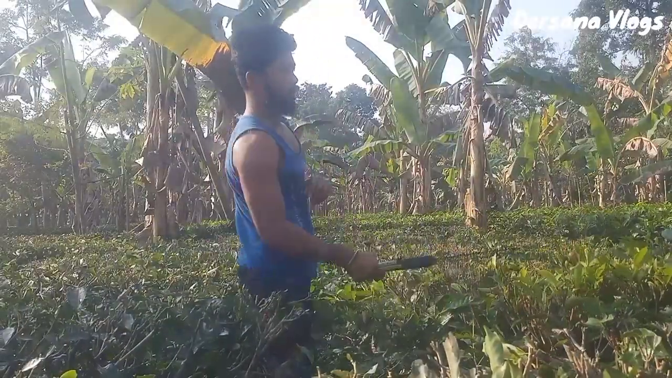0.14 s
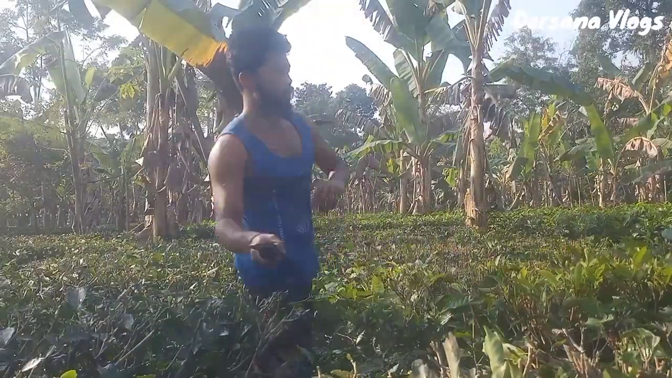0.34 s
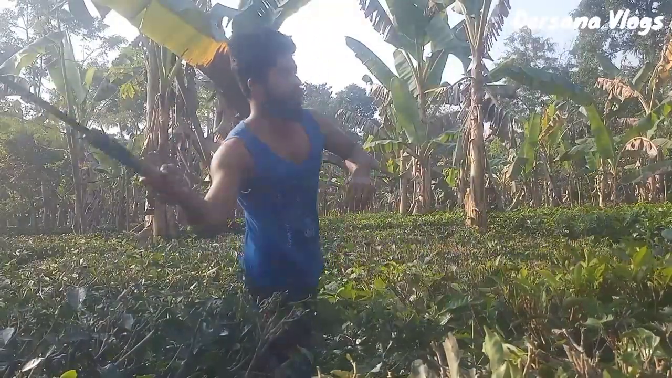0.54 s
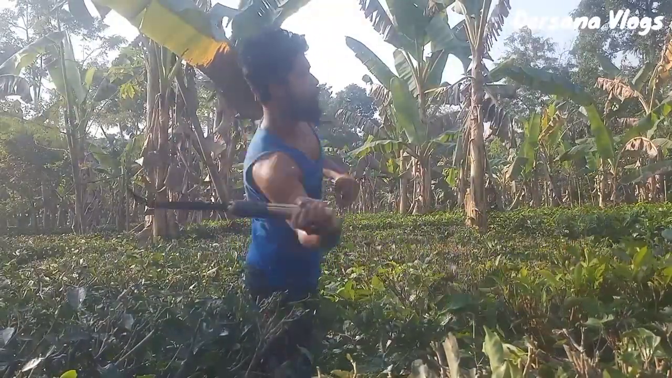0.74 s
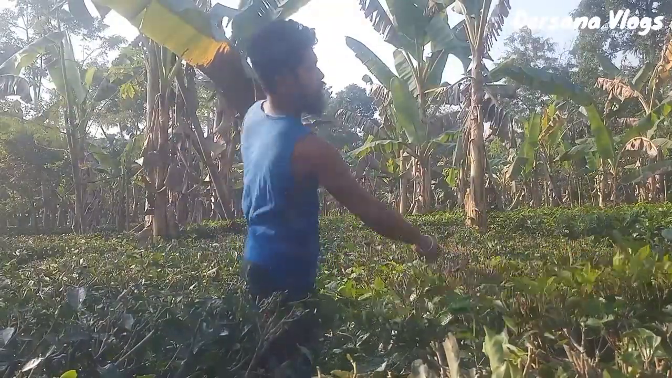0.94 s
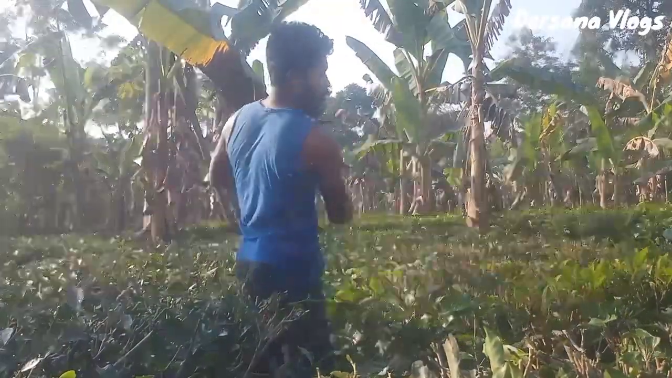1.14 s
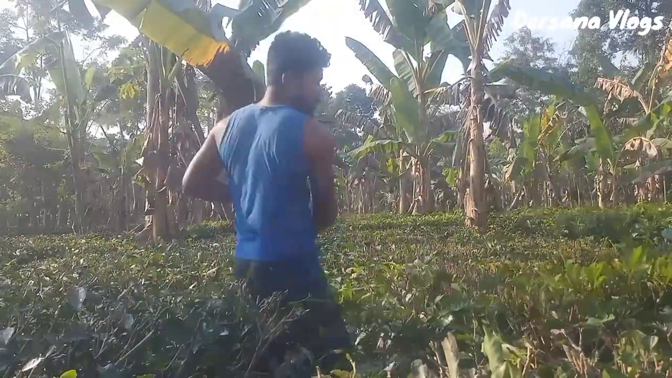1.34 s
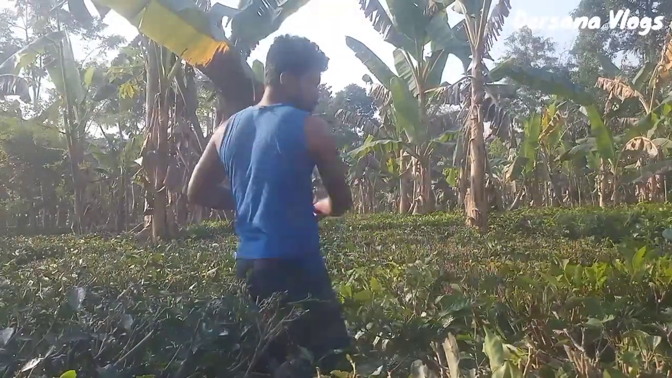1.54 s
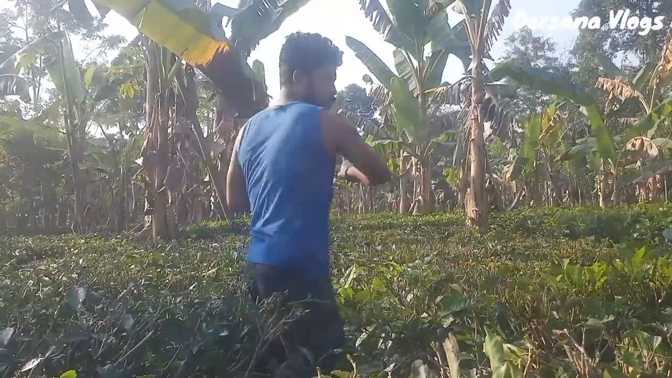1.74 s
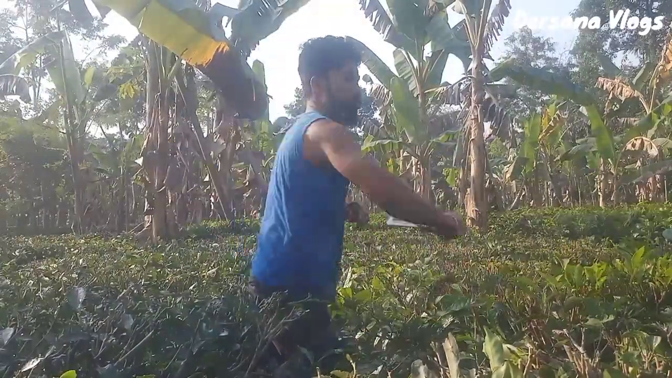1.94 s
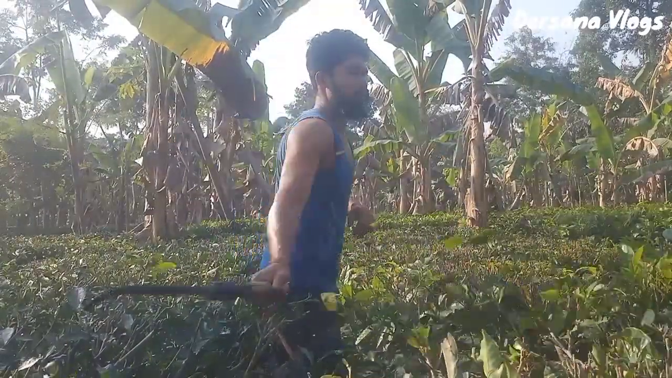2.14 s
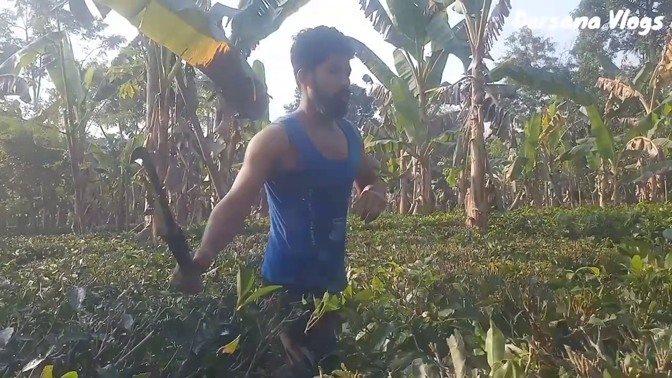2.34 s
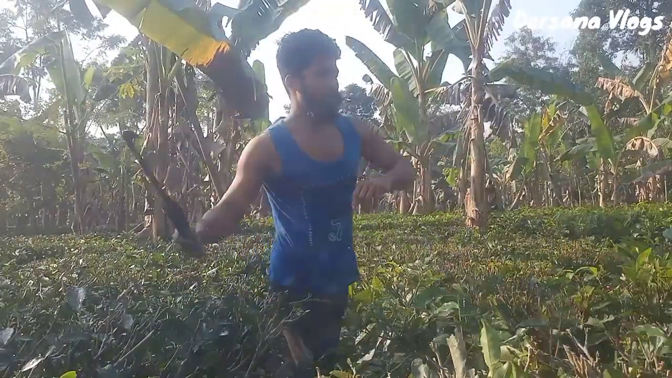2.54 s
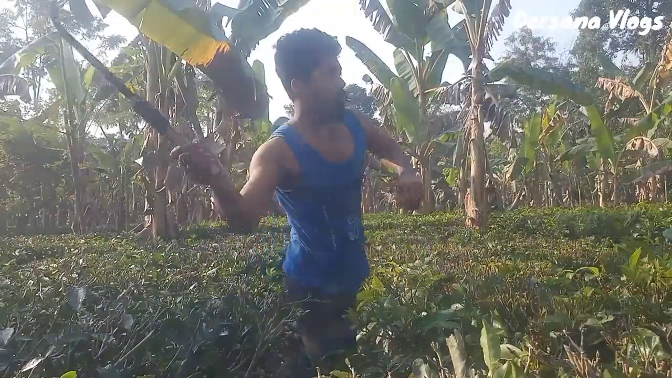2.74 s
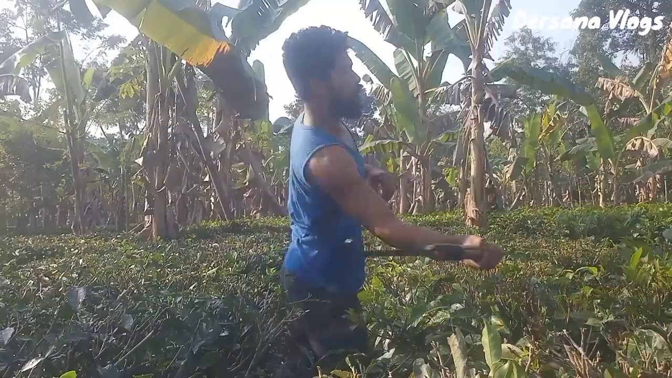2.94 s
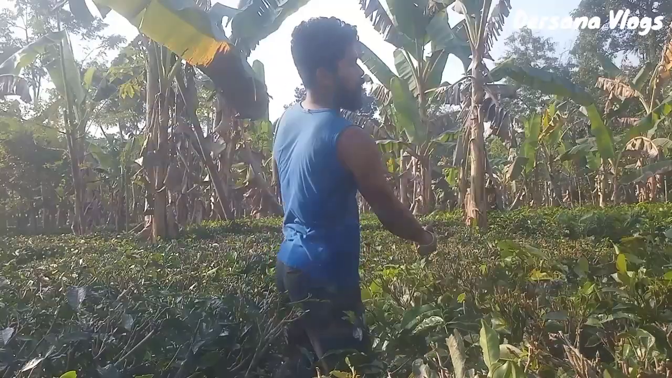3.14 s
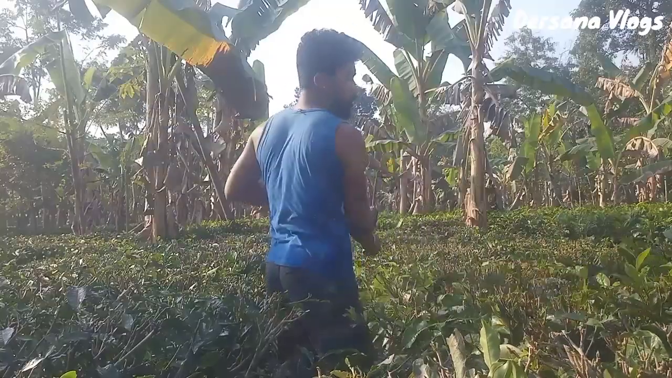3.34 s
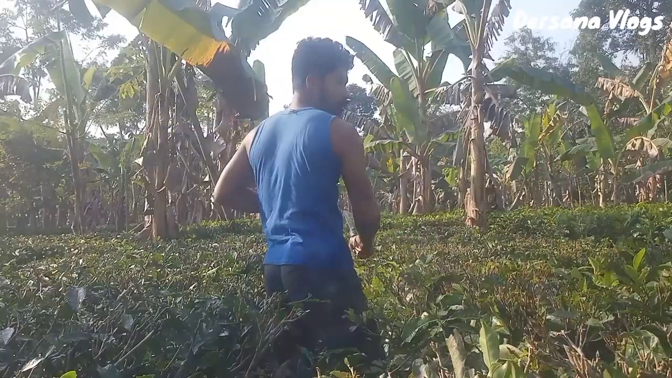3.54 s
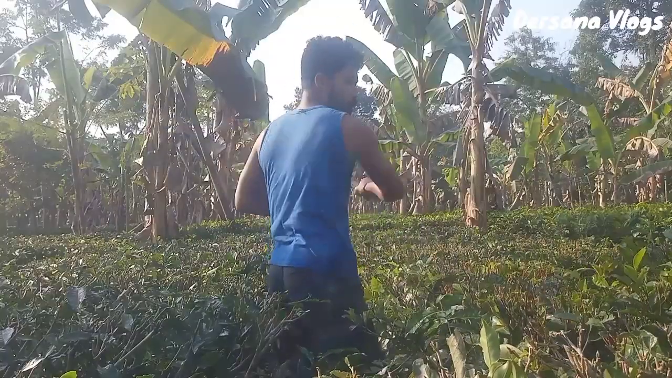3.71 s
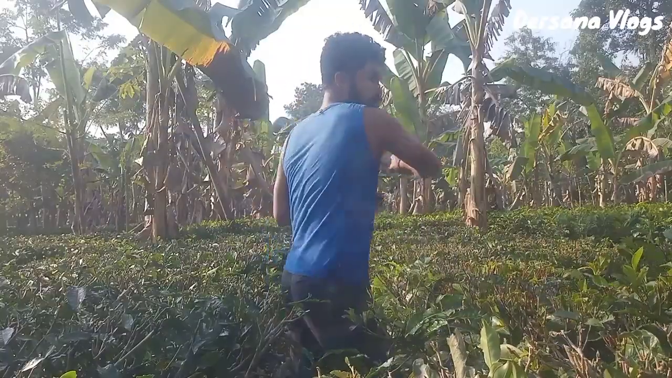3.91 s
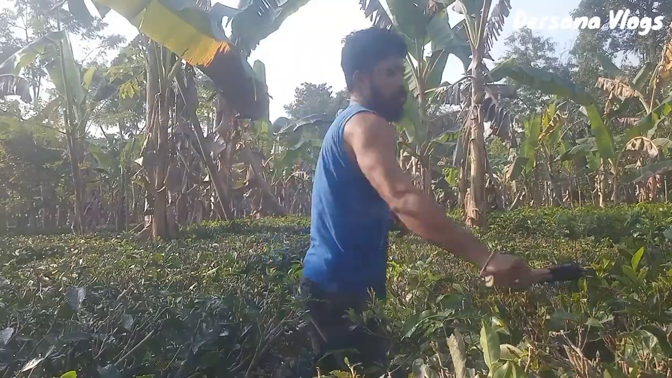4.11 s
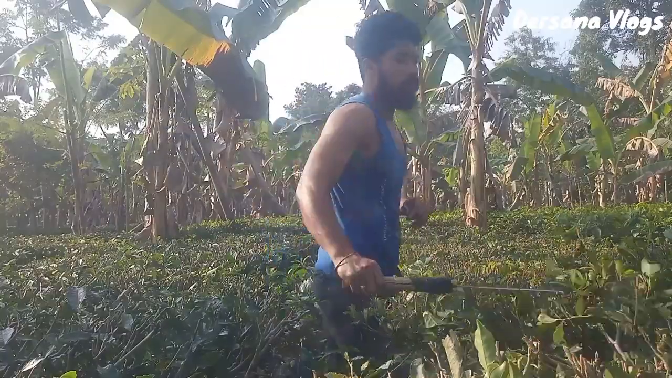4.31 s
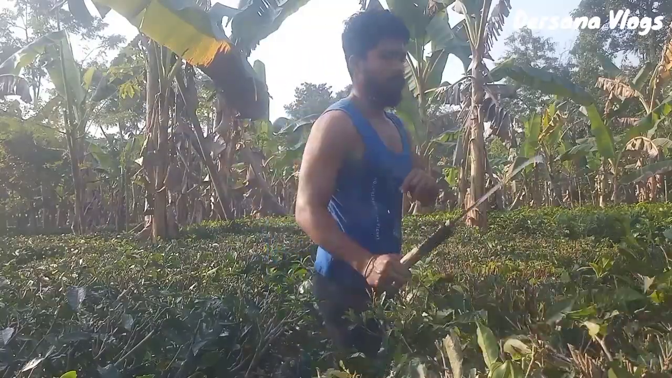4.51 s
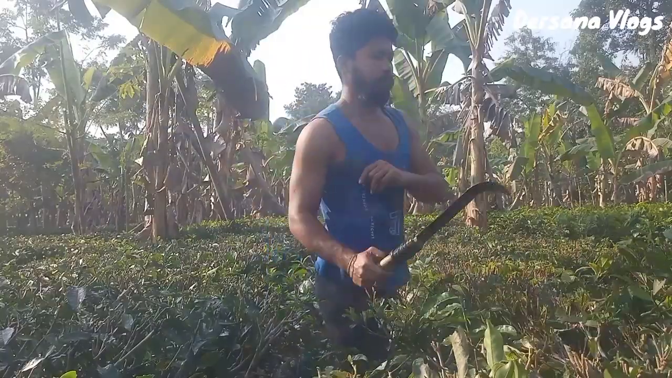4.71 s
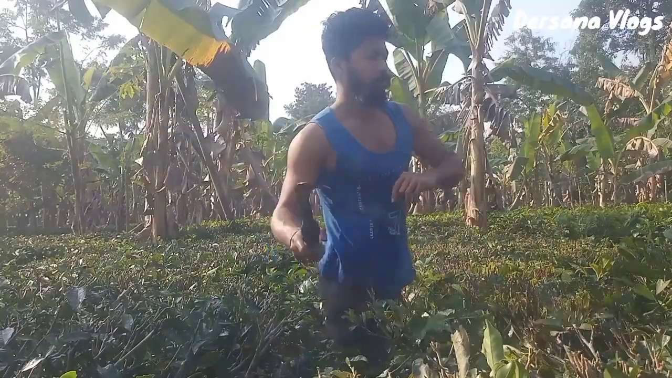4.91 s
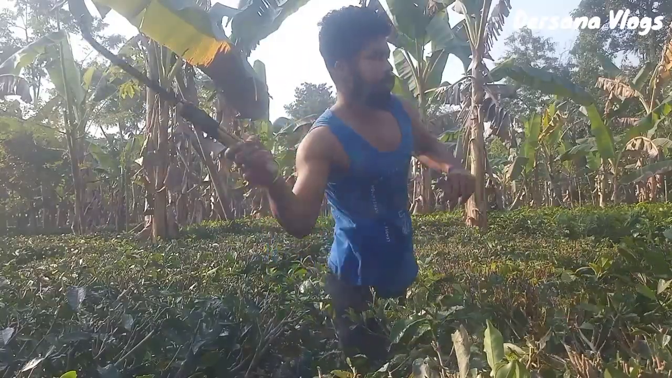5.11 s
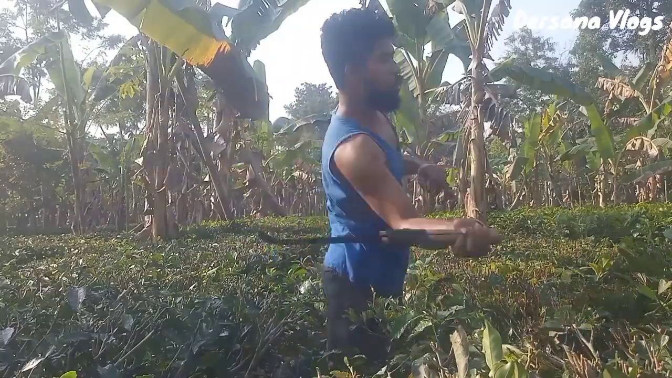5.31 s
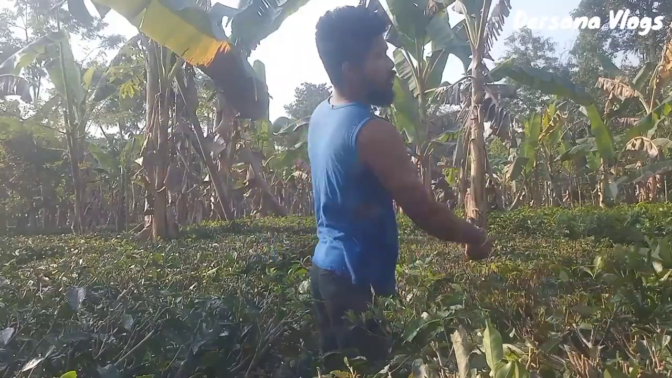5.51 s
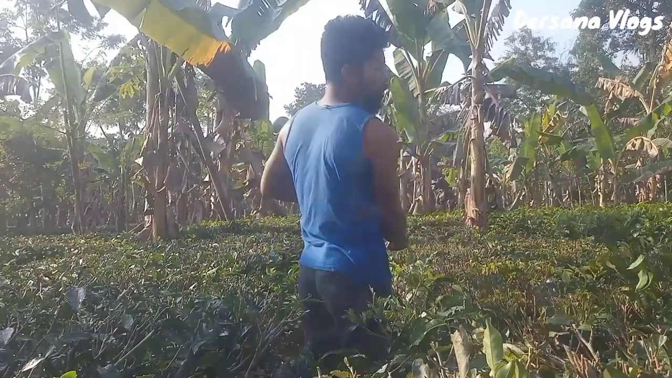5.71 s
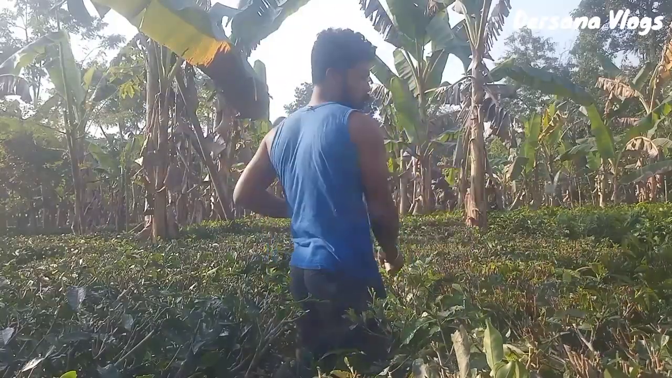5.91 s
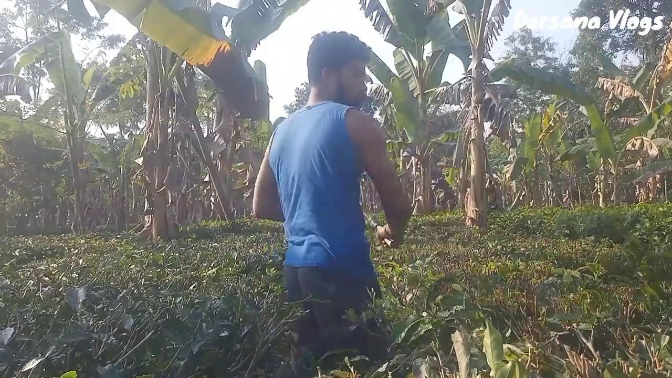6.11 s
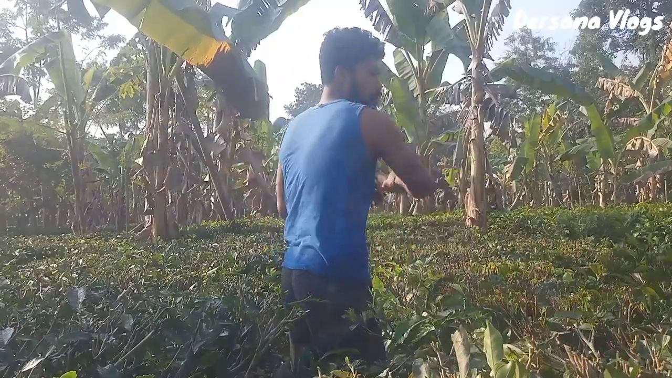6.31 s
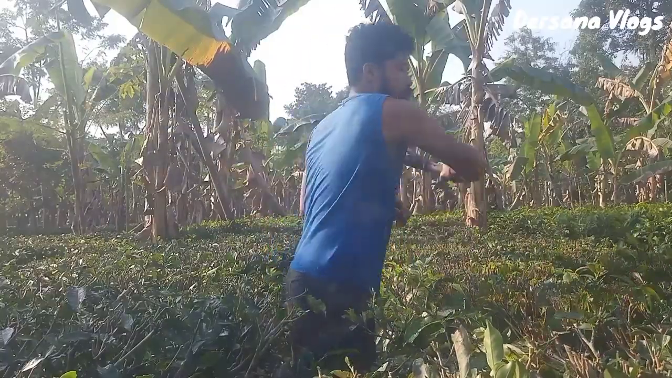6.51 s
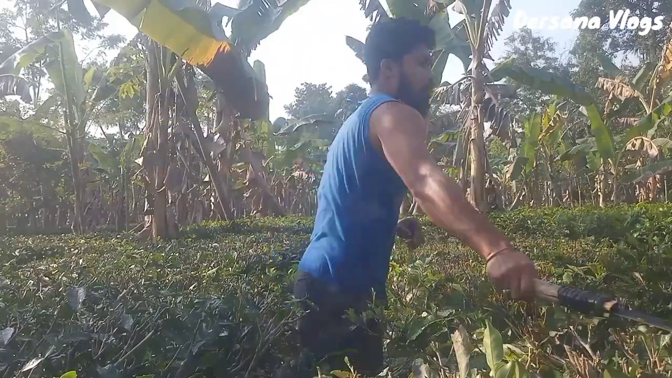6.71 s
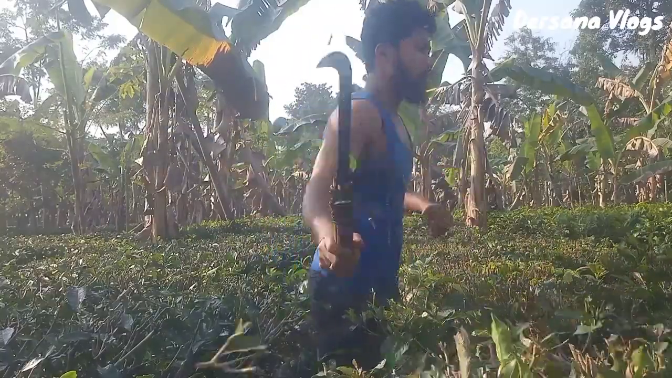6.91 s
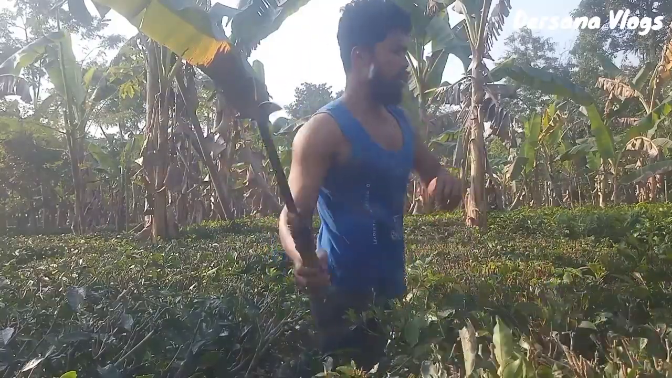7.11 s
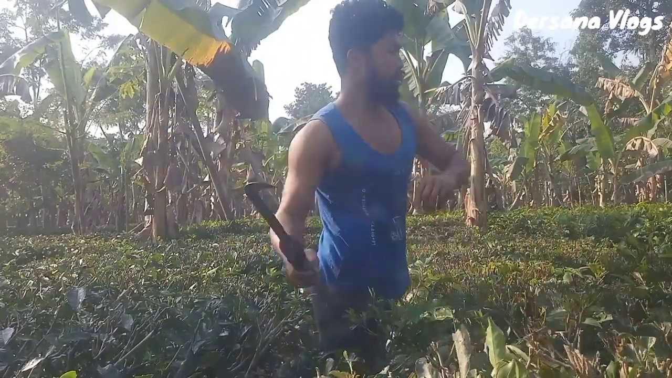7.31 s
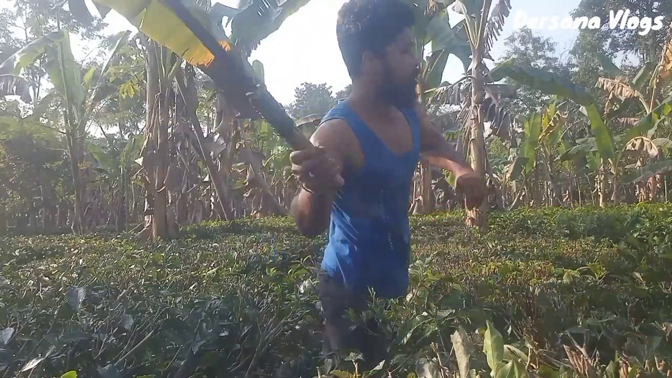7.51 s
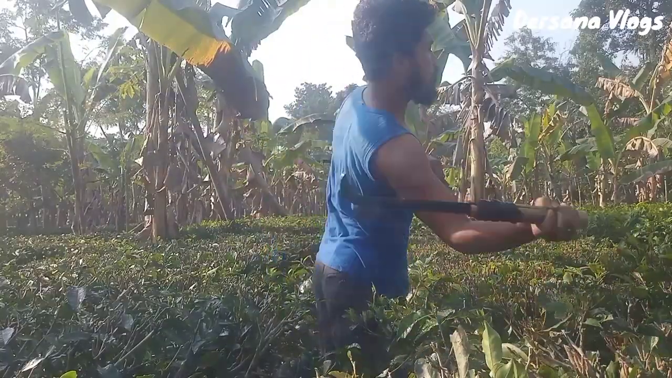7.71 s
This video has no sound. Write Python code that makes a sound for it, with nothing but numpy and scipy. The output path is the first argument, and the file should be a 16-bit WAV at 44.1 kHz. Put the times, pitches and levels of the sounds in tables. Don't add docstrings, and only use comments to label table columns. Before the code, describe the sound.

For the first second there is only soft leaf rustle, light brushing movement, a few small twig snaps and very faint high bird chirps over a quiet garden. At about 1.05 seconds a blade bites through foliage with a loud crunch and several stem cracks. Branches whip back and leaves swish, then settle among tiny ticks and a hollow knock. Further cuts come near 2.2, sharp and hissy; 3.2, loudest and short; 4.3, with a hard double crack; 5.6, with a longer tail and bright stalk knocks just after; and 6.9, with the longest swish. Between them, leaves stir and twigs snap, notably at 4.5 and 5.8. A faint bird note comes at 2.8 and two rising ones near 7.6 as rustling continues to the end. The sound is close, dry and outdoors, brighter and overloaded on the right, muffled on the left.

```python
import sys
import numpy as np
from scipy import signal
from scipy.fft import rfft, irfft
from scipy.io import wavfile

SR = 44100
rng = np.random.default_rng(int(sys.argv[2]) if len(sys.argv) > 2 else 0)


def level_to_linear(level):
    exponent = np.asarray(level, float) / 20
    return 10 ** exponent


def transcribe(u):
    v = np.clip(np.atleast_2d(u).T, -1, 1)
    q = np.round(v * 32767).astype(np.int16)
    wavfile.write(sys.argv[1], SR, q)


N = 341775
TOP_HZ = 14600

# first touch in seconds, cut in seconds, rise in seconds, peak in dB, t60 in seconds.
CUTS = [
    (1.05, 1.057, 0.014, -11, 0.1),
    (2.216, 2.224, 0.0034, -11.5, 0.17),
    (3.192, 3.198, 0.0093, -8, 0.079),
    (4.312, 4.326, 0.0057, -10.5, 0.11),
    (5.577, 5.585, 0.0056, -11.5, 0.26),
    (6.862, 6.878, .006, -12.5, 0.41),
]
# first touch in dB, hold in seconds, extra thud in dB, extra hiss in dB.
BITES = [
    (-22, 0.018, -1, 0),
    (-28, 0.01, 5, 4),
    (-26.5, 0.0099, 1.5, -0.5),
    (-21, 0.033, -1, 1),
    (-30.5, 0.011, -7, 2.5),
    (-36.5, 0.022, 0.5, 1),
]
# whip in dB, whip t60 in seconds, settle in dB,
# settle t60 in seconds.
AFTER = [
    (-36, 0.42, -41, 3.8),
    (-17.5, 0.38, -37, 3.95),
    (-18, 0.78, -35.5, 4.8),
    (-18, 0.6, -38, 4.04),
    (-21, 0.99, -31, 2.77),
    (-16.5, 0.48, -39, 5),
    (-19.5, 0.79, -30.5, 2.56),
]
# middle in seconds, length in seconds, level in dB, extra thud in dB.
STIRS = [(0.273, 0.086, -42, 7.5), (0.527, 0.26, -50, 2), (0.822, 0.085, -49, 7), (1.025, 0.087, -52.5, 6),
         (1.192, 0.052, -38, 9), (1.417, 0.16, -52.5, 16), (1.757, 0.26, -45, 3), (2.036, 0.13, -52.5, -1),
         (2.894, 0.067, -53, 18), (3.685, 0.84, -48, 6), (4.058, .14, -47.5, 2.5),
         (4.236, 0.068, -44.5, -6), (4.624, 0.24, -36, 4.5), (4.885, 0.13, -41, -0.5), (5.052, .1, -42, -7),
         (5.145, 0.057, -45, -10), (5.314, 0.16, -47.5, -20), (6.01, 0.24, -56, -7), (6.31, 0.13, -46, 7.5),
         (6.513, 0.09, -47.5, 4), (6.76, 0.035, -59, -10), (7.199, 0.1, -35.5, 6.5),
         (7.355, 0.036, -39.5, 4), (7.4, .05, -38, 8), (7.533, 0.2, -45, -16), (7.7, 0.11, -44.5, -11)]
# thud in dB, swish in dB, hiss in dB, air in dB.
CUT_TONE_DB = (-8, -1, -6, -15.5)
WHIP_TONE_DB = (-2, 3, -2, -9)
SETTLE_TONE_DB = (-7.5, 0.5, -9.5, -18)
STIR_TONE_DB = (-9.5, 0.5, -9.5, -19)
BAND_EDGES_HZ = [50, 900, 4300, 7800, 19000]
# frequency in Hz, density in dB per Hz.
LEAVES_SPECTRUM = [(24, -40), (40, -38), (77, -15.5), (136, -10), (179, -11.5), (319, -6.5), (626, -1.5),
                   (911, -1.5), (2610, 3.5), (4300, -3.5), (6410, 8.5), (8230, -9), (11100, -16.5),
                   (14600, -11), (15800, -29)]
# start in seconds, peak in dB, ring in Hz, crack in dB re peak.
STEMS = [
    (1.055, -18, 2380, -3),
    (1.063, -8, 3440, -18),
    (1.07, -2, 2320, -14),
    (2.229, -25, 2520, 0),
    (3.199, -5.5, 2430, -6),
    (4.315, -12, 2870, -1),
    (4.329, -2.5, 2690, 3),
    (5.591, -3, 1800, -19),
    (6.886, -1.5, 2870, -18),
]
# start in seconds, peak in dB, ring in Hz, crack in dB re peak.
TWIGS = [(.258, -19.5, 1600, -32), (0.647, -28.5, 2660, -1), (0.818, -22, 2200, -34),
         (1.426, -22.5, 1500, -30), (1.672, -20, 1920, -31), (1.706, -23, 2520, -27),
         (2.181, -28.5, 2170, -21), (2.356, -20, 564, 8), (2.565, -18.5, 2920, -20),
         (2.744, -24.5, 2640, 4.5), (3.016, -23, 2500, -12), (3.07, -19, 2330, 4), (3.575, -22, 2120, -18),
         (3.612, -22, 2270, -19), (3.705, -23, 2190, -23), (3.777, -22.5, 2370, -23),
         (4.015, -31.5, 1380, 5.5), (4.038, -21.5, 1710, -30), (4.456, -12, 2550, -25),
         (5.022, -20.5, 2100, -31), (5.079, -30, 1620, 2), (5.838, -16, 2570, -4), (5.963, -23, 2140, -27),
         (6.017, -22.5, 2640, 0), (6.243, -23.5, 2070, -3), (6.849, -37, 2160, -4), (7.332, -33, 442, 16),
         (2.211, -27.5, 2310, 4), (3.233, -2, 2000, -10.5), (7.54, -19.5, 2680, -25)]
# start in seconds, peak in dB, ring in Hz, t60 in seconds, band edge ratio to ring.
STALKS = [
    (1.242, -19, 553.7, 0.1, 1.96),
    (1.756, -19, 1100, 0.028, 1.21),
    (3.069, -25.5, 710, 0.022, 1.66),
    (5.725, -5, 1900, 0.031, 1.12),
    (5.934, -21.5, 1204, 0.036, 1.46),
    (.817, -28, 860, 0.031, 1.48),
    (5.637, -0.5, 1490, 0.039, 1.7),
    (6.641, -20, 880, 0.028, 1.56),
]
# start in seconds, peak in dB, ring in Hz.
SHOOTS = [(.399, -31, 2080), (.485, -30, 2690), (.572, -31, 2230), (.752, -30, 2000), (.913, -31.5, 2385),
          (.943, -36, 3180), (1.262, -22, 2200), (1.432, -23, 2850), (1.577, -28, 2160), (2.806, -26, 2680),
          (2.94, -24, 2300), (3.114, -35, 2190), (3.8, -25, 2050), (3.864, -28, 2100), (3.962, -34, 2310),
          (4.149, -30.5, 1820), (4.774, -38, 2190), (4.881, -37, 2470), (5.125, -35, 2340),
          (5.148, -27, 2400), (6.085, -49, 2550), (6.122, -34, 1370), (6.287, -29, 2290),
          (6.308, -28, 2140), (6.546, -31, 2030), (6.744, -38, 2450), (6.832, -37, 3360),
          (7.522, -41, 2870), (7.66, -30, 2240)]
# start in seconds, length in seconds, slide from in Hz, slide to in Hz, level in dB
NOTES = [
    (.163, .043, 7000, 7000, -58),
    (.279, .074, 6350, 6980, -59),
    (.42, .062, 5900, 4200, -71),
    (2.807, .064, 7250, 6650, -59),
    (7.534, .052, 5750, 7100, -56),
    (7.652, .038, 5500, 7050, -61),
]
# frequency in Hz, density in dB per Hz.
GARDEN_SPECTRUM = [(18, -35), (30, 0.5), (90, 13.5), (214, 1), (595, -5), (1270, -22), (2390, 11),
                   (4370, -24), (6640, -31), (8410, -15), (10600, -21), (14600, -20), (15800, -5)]


def effort():
    t = np.arange(N) / SR
    cut, stir = np.zeros((2, 4, N))
    whip, settle = np.full((2, N), 1e-12)
    for (touch_s, s, rise_s, db, t60_s), (touch_db, hold_s, thud_db, hiss_db) in zip(CUTS, BITES):
        to_cut = np.clip((s - t) / (s - touch_s), 0, 1)
        cut += level_to_linear(2 * (touch_db - 5.3 * to_cut)) * (t >= touch_s) * (t < s)
        after_rise_s = t - s - rise_s
        rise_db = np.minimum(6.9 * after_rise_s / rise_s * (t >= s), 0)
        fall_db = 60 / t60_s * np.maximum(after_rise_s - hold_s, 0)
        extra_db = np.c_[[thud_db, 0, hiss_db, hiss_db]]
        cut += level_to_linear(2 * (db + rise_db - fall_db + extra_db)) * (t >= s)
    starts_s = [0] + [s for _, s, *_ in CUTS]
    ends_s = starts_s[1:] + [N / SR]
    for s, end_s, (whip_db, whip_t60_s, settle_db, settle_t60_s) in zip(starts_s, ends_s, AFTER):
        now = (t >= s) * (t < end_s)
        since_s = (t - s) * now
        onset = np.clip((t - s) / 0.015, 0, 1) ** 2
        whip += now * onset * level_to_linear(2 * (whip_db - 60 / whip_t60_s * since_s))
        settle += now * level_to_linear(2 * (settle_db - 60 / settle_t60_s * since_s))
    for s, length_s, db, thud_db in STIRS:
        swell = np.exp(-0.5 * (4 * (t - s) / length_s) ** 2)
        stir += level_to_linear(2 * (db + np.c_[[thud_db, 0, 0, 0]])) * swell
    tones = level_to_linear(2 * np.array([CUT_TONE_DB, WHIP_TONE_DB, SETTLE_TONE_DB, STIR_TONE_DB]))
    power = sum(tone[:, None] * motion for tone, motion in zip(tones, (cut, whip, settle, stir)))
    wander_db = 1.06 * rms_one(butter(rng.standard_normal((4, N)), "band", [2, 9]))
    return 10 * np.log10(power) + wander_db


def brush(levels_db):
    contacts = crackle(per_s=110, spread_db=3.0, t60_s=0.016)
    sway = level_to_linear(0.36 * rms_one(butter(rng.standard_normal(N), "band", [7, 30])))
    grain = sway * (2.9 + 0.2 * contacts)
    patch_db = np.interp(levels_db[1], [-42, -28], [2.4, 0.7])
    out = 0
    for low_hz, high_hz, db in zip(BAND_EDGES_HZ, BAND_EDGES_HZ[1:], levels_db):
        leaves = coloured(grain * rng.standard_normal((2, N)), LEAVES_SPECTRUM)
        band = butter(leaves, "band", [low_hz, high_hz], order=3)
        out = out + rms_one(patchy(band, low_hz, high_hz, patch_db)) * level_to_linear(db)
    return level_to_linear(0.19) * out


def crackle(per_s, spread_db, t60_s):
    sizes = level_to_linear(spread_db * np.minimum(rng.exponential(1, N), 5))
    contacts = sizes * (rng.random(N) < per_s / SR)
    return rms_one(decay(contacts, t60_s))


def patchy(x, low_hz, high_hz, depth_db):
    lower = butter(x, "low", np.sqrt(max(low_hz, 200) * high_hz))
    flicker = level_to_linear(depth_db * rms_one(butter(rng.standard_normal((2, N)), "band", [4, 28])))
    return lower * flicker[0] + (x - lower) * flicker[1]


def ticks(swish_db):
    sizes = level_to_linear(3.0 * np.minimum(rng.exponential(1, N), 3.5)) * rng.choice([-1, 1], N)
    clicks = sizes * (rng.random(N) < 180 / SR)
    pitch = rng.integers(0, 14, N)
    out = 0
    for k, hz in enumerate(np.geomspace(1100, 6500, 14)):
        r = level_to_linear(-60 * hz / 7 / SR)
        w = 2 * np.pi * hz / SR
        ring = [1, -2 * r * np.cos(w), r * r]
        out = out + signal.lfilter([0, np.sin(w)], ring, clicks * (pitch == k) + 1e-18)
    return level_to_linear(swish_db - 6.5) * rms_one(coloured(out[None], LEAVES_SPECTRUM)[0])


def snaps():
    out = np.zeros(N)
    for s, db, hz, crack_db in STEMS:
        out += snap(s, db, hz, 0.019, crack_db, knock_db=-10, width=1.16)
    for s, db, hz, crack_db in TWIGS:
        out += snap(s, db, hz, 0.031, crack_db, knock_db=-21, width=1.266)
    for s, db, hz, t60_s, width in STALKS:
        out += snap(s, db, hz, t60_s, crack_db=-23, knock_db=-21, width=width)
    for s, db, hz in SHOOTS:
        out += snap(s, db, hz, 0.03, crack_db=-22, knock_db=-17, width=1.18)
    return out


def snap(s, peak_db, ring_hz, t60_s, crack_db, knock_db, width):
    span = np.arange(2600)
    puff = 0.085 * rng.standard_normal(len(span)) * level_to_linear(-60 * span / SR / np.clip(t60_s, 0.004, 0.07))
    puff[0] = 1
    puff = butter(puff, "low", 6500, order=4)
    wood = butter(puff, "band", [ring_hz / width, ring_hz * width])
    crack = butter(puff, "band", [3300, 7400], order=3)
    knock = butter(puff, "band", [220, 1100])
    parts = zip((wood, crack, knock), (0, crack_db, knock_db))
    sound = sum(level_to_linear(peak_db + db) * part / np.abs(part).max() for part, db in parts)
    return np.pad(sound, (round((s + 0.0004) * SR), N))[:N]


def bird():
    scoop_hz, scoop_s = 2600, 0.005
    t = np.arange(N) / SR
    flutter = level_to_linear(2.6 * rms_one(butter(rng.standard_normal(N), "low", 200)))
    out = np.zeros(N)
    for s, length_s, from_hz, to_hz, db in NOTES:
        share = np.clip((t - s) / length_s, 0, 1)
        slide_hz = from_hz + (to_hz - from_hz) * share
        hz = slide_hz - scoop_hz * np.exp(-share * length_s / scoop_s)
        swell = np.interp(share, [0, 0.75, 1], [0, 1, 0]) ** 0.9
        out += np.sin(2 * np.pi * np.cumsum(hz) / SR) * swell * level_to_linear(db + 21.5)
    return out * flutter


def garden():
    patches = level_to_linear(1.63 * rms_one(butter(rng.standard_normal(N), "low", 11)))
    return level_to_linear(-58.0) * patches * rms_one(coloured(rng.standard_normal((2, N)), GARDEN_SPECTRUM))


def covered_port(same, other):
    heard = butter(same, "low", 2000, order=1) + 0.9 * butter(other, "high", 1100, order=1)
    late = np.roll(heard, 4)
    muffled = butter(butter(late, "low", 430, order=1), "low", 4600, order=5)
    return level_to_linear(-3.0) * muffled + level_to_linear(-3) * butter(other, "low", 41)


def rms_one(x):
    return x / np.sqrt(np.mean(x ** 2) + 1e-20)


def butter(x, kind, hz, order=2):
    return signal.sosfilt(signal.butter(order, hz, kind, fs=SR, output="sos"), x)


def coloured(x, spectrum):
    hz, db = np.transpose(spectrum)
    grid_hz = np.minimum(np.linspace(1, SR / 2, 2049), TOP_HZ)
    cepstrum = irfft(np.log(level_to_linear(np.interp(np.log(grid_hz), np.log(hz), db))))
    cepstrum[1:2048] *= 2
    cepstrum[2049:] = 0
    pulse = irfft(np.exp(rfft(cepstrum)))
    return signal.fftconvolve(x, pulse[None], axes=1)[:, :N]


def decay(x, t60_s):
    return signal.lfilter([1], [1, -level_to_linear(-60 / (t60_s * SR))], x + 1e-18)


def scene():
    levels_db = effort()
    leaves = brush(levels_db) + ticks(levels_db[1])
    same, other = leaves + garden() + snaps() + bird()
    return np.array([covered_port(same, other), same])


def top_cut(x):
    return signal.sosfilt(signal.butter(12, 15920, fs=SR, output="sos"), x)


def record(dry):
    no_rumble = butter(dry, "high", 42)
    no_top = signal.sosfilt(signal.cheby2(12, 60, 16100, fs=SR, output="sos"), no_rumble)
    return top_cut(np.clip(no_top, -1.01, 1.01))


dry = scene()
out = record(dry)
transcribe(out)
```